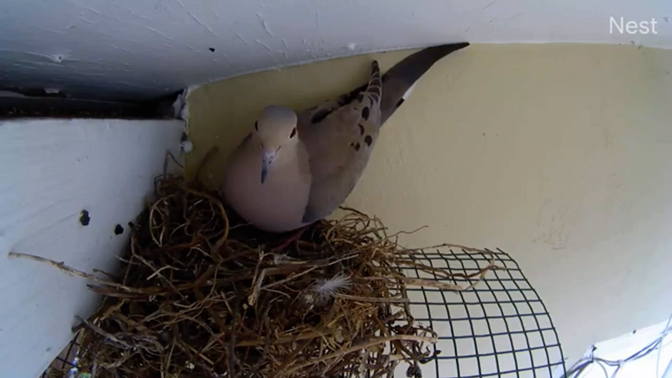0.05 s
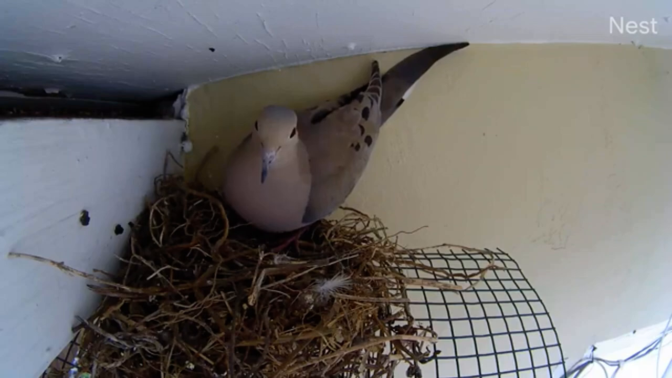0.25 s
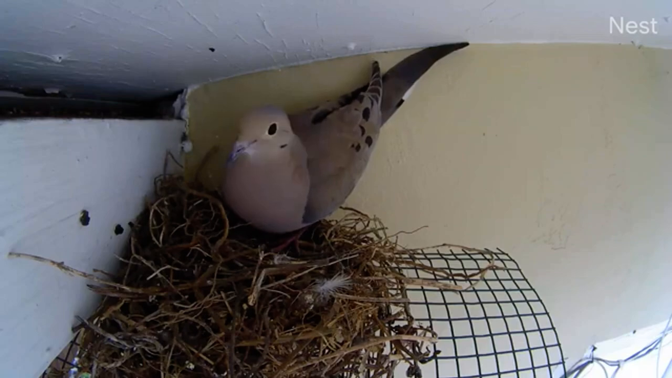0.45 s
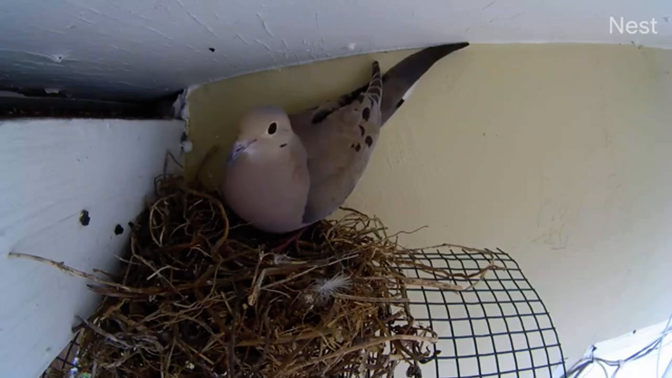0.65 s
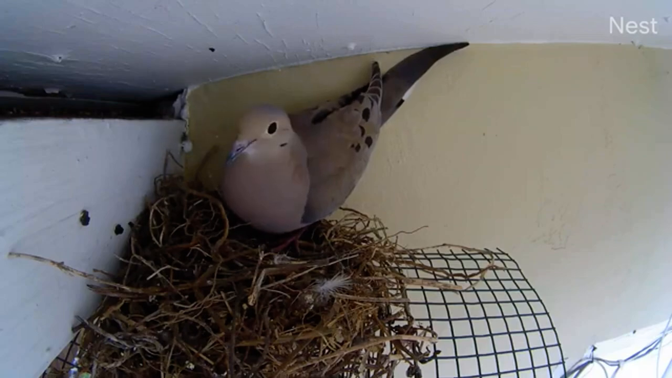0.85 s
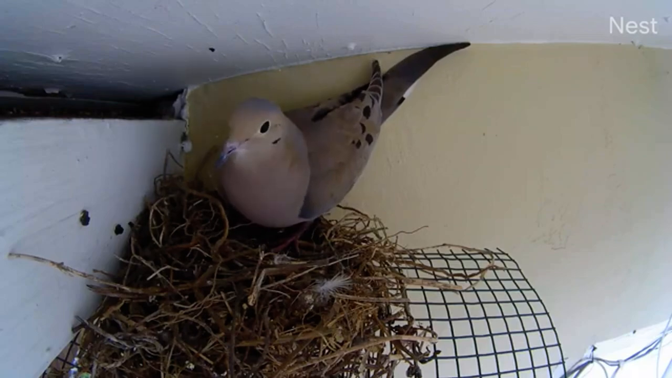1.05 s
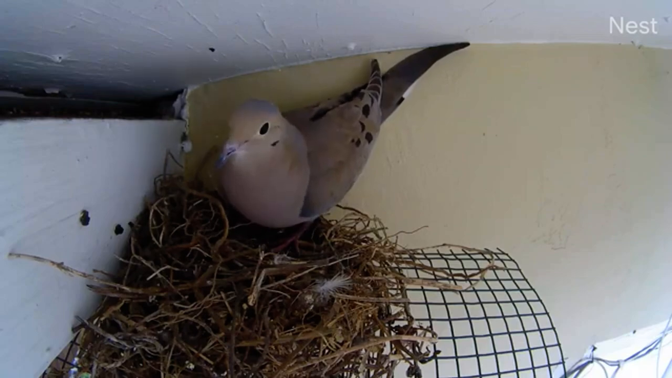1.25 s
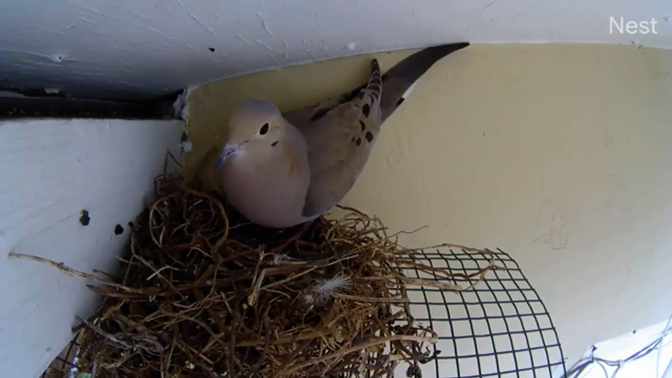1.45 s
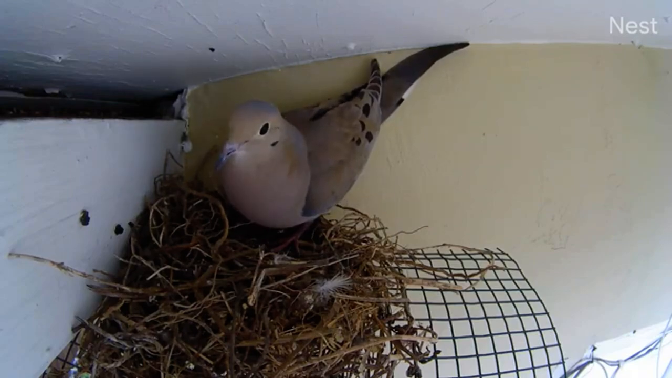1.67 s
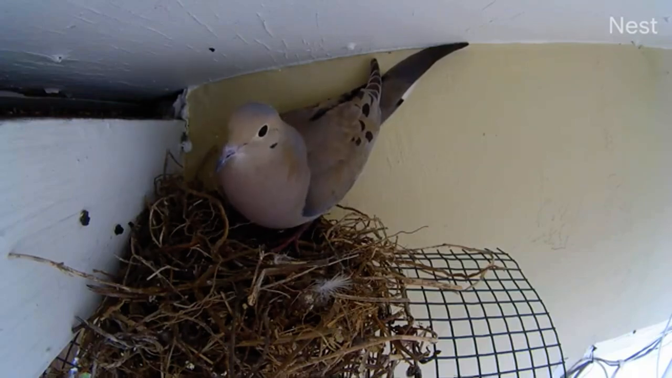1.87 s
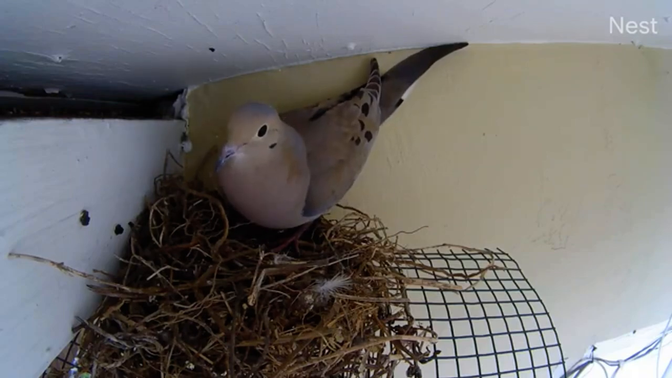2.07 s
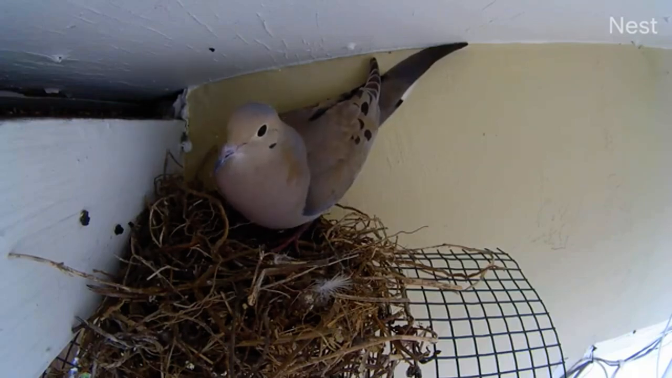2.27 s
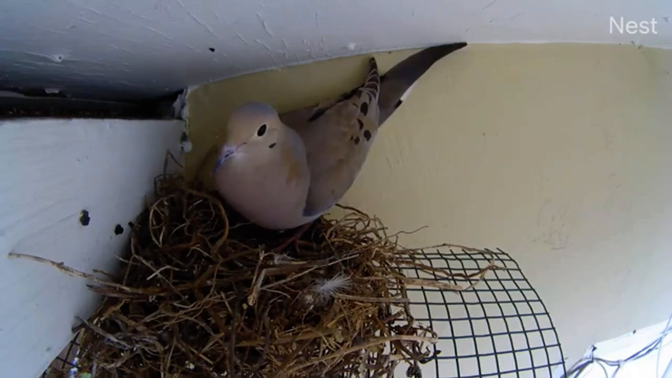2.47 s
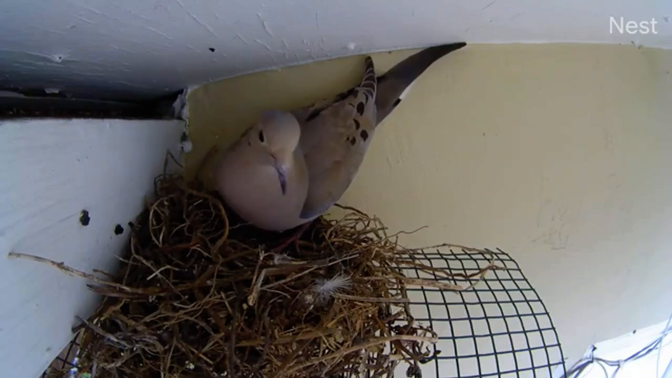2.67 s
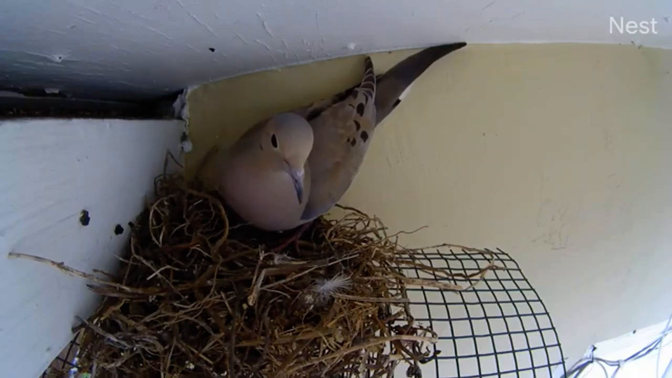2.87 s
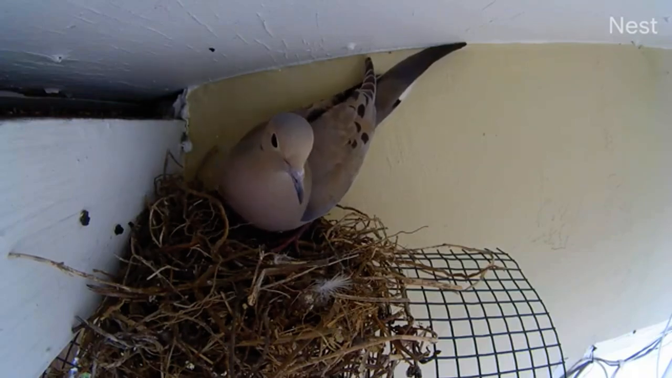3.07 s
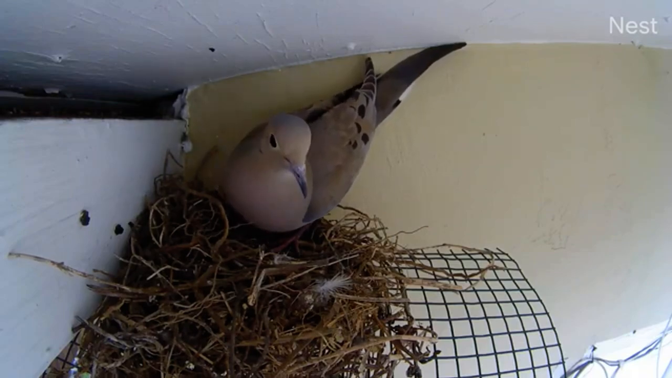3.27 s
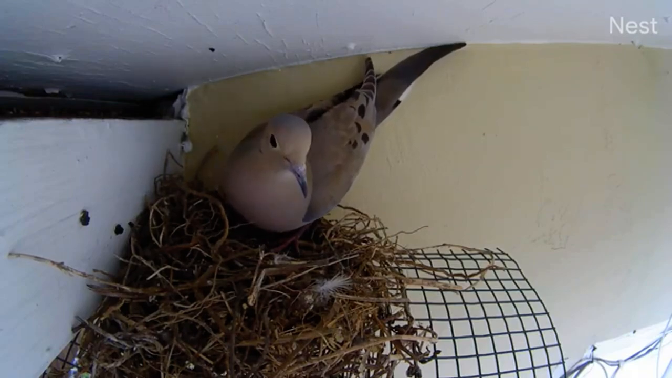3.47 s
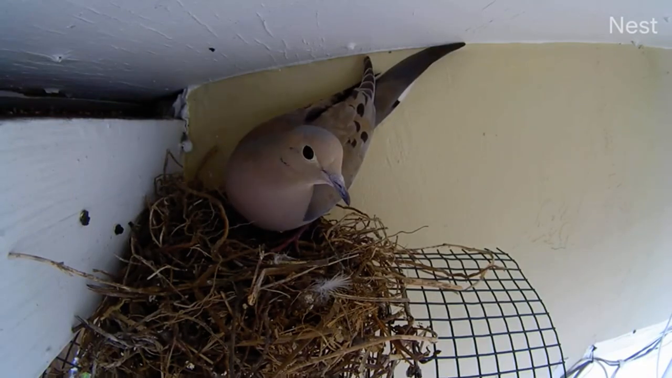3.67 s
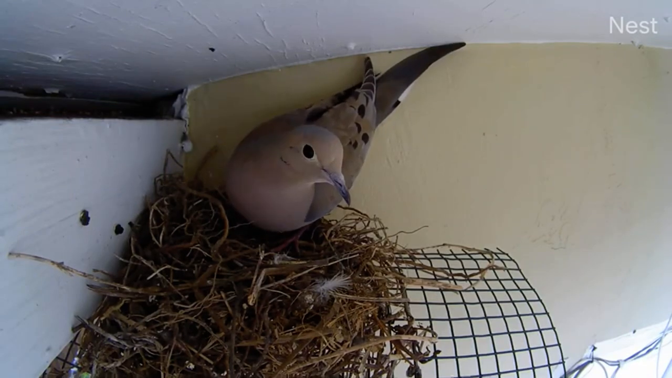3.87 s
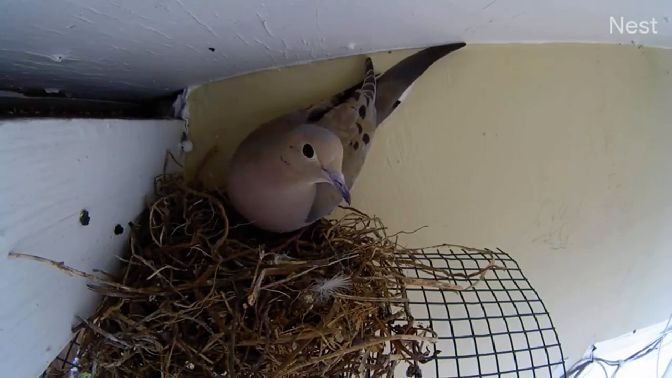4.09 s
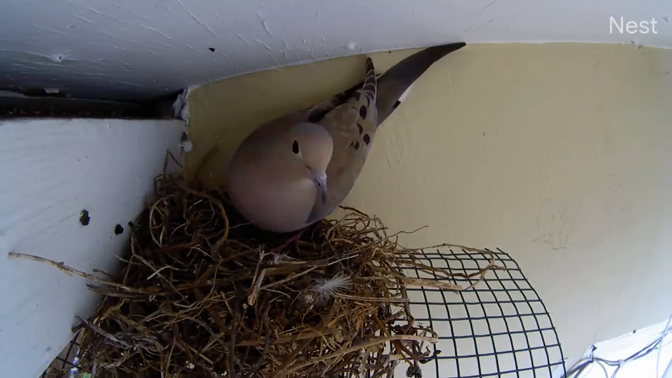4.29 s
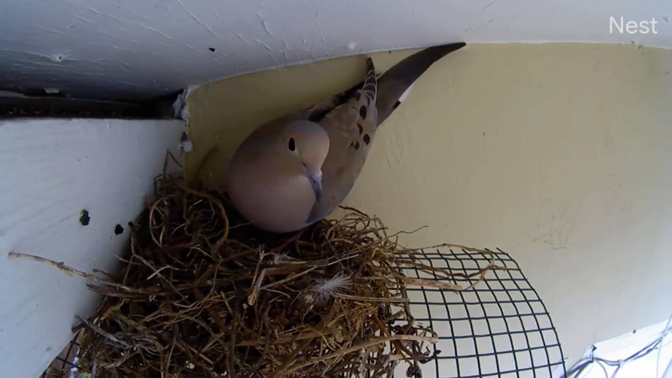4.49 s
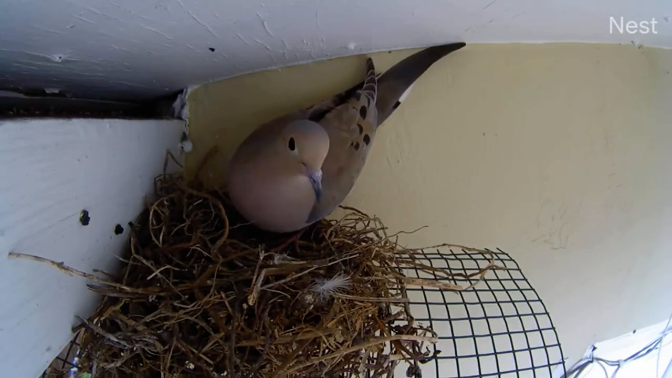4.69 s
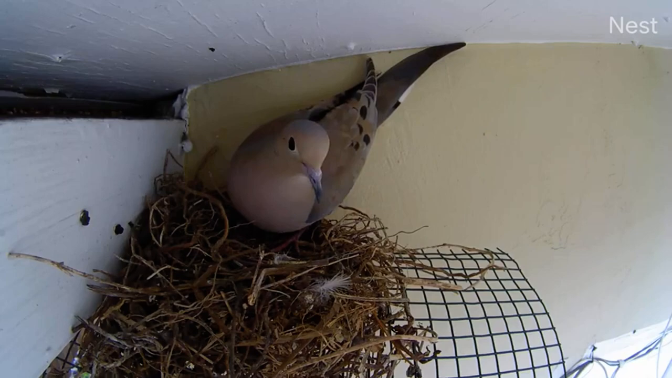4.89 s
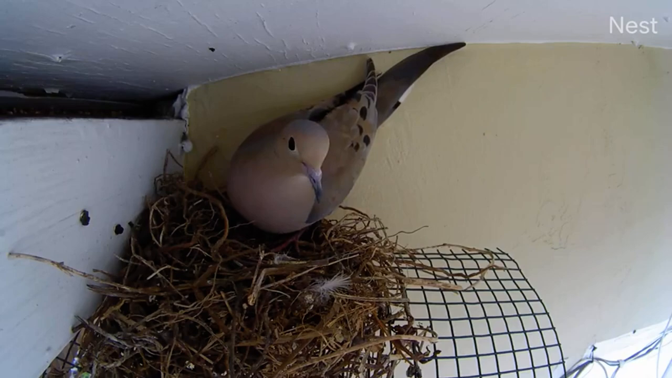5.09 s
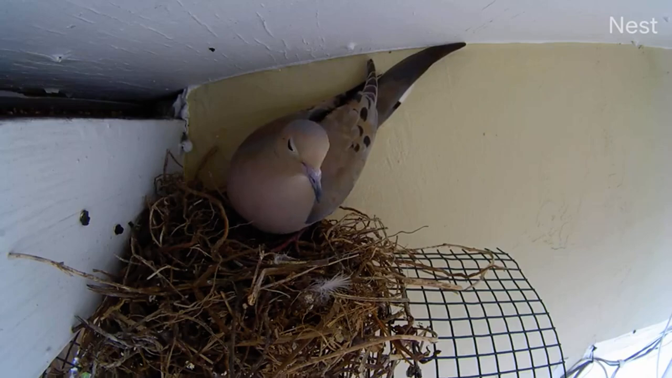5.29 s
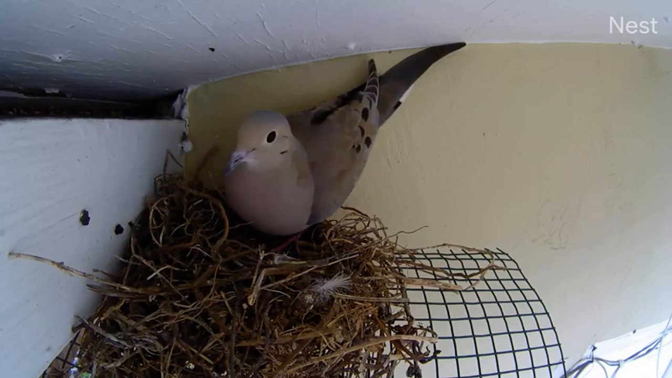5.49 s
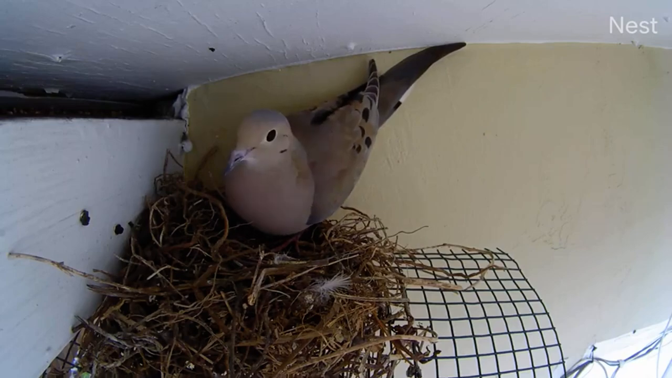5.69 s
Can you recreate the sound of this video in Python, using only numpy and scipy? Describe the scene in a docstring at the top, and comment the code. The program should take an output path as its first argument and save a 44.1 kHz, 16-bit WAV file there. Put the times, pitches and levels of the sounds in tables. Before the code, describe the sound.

Under a sheltered porch roof, small birds peep faintly for about a second, then a nearby dove gives one low, breathy coo: a wavering held note, a sudden leap up, a sinking end. Raspy chirps and quick chatter fill the middle afterwards, then two harsh rattling bursts. The microphone is close to the dove; the other birds are distant and diffuse, over a very faint outdoor hush.

```python
"""Dove coo among small birds

A dove under a porch roof gives one long coo close by: a low, husky held note that leaps up, clears and sinks.
Its voice is a near sine with weak overtones, a beating second vibration and throat-coloured noise.
Small birds peep, chirp and rattle farther off: gliding, frequency-modulated sines smeared by a diffuse
tail and coloured by porch resonances. Thin hiss and a faint outdoor hush are shaped noise."""
import sys
import numpy as np
from scipy import signal
from scipy.fft import rfft, irfft, next_fast_len
from scipy.io import wavfile
from scipy.ndimage import map_coordinates

SR = 44100
rng = np.random.default_rng(int(sys.argv[2]) if len(sys.argv) > 2 else 0)


def digitize_waveform(pressure):
    """Quantize a signal to 16-bit integers and store it at the path in sys.argv[1].

    Rows of a 2-D input are taken as channels; values are limited to [-1, 1].
    """
    field = np.atleast_2d(pressure).T
    bounded = np.clip(field, -1, 1)
    quanta = np.round(bounded * 32767).astype(np.int16)
    wavfile.write(sys.argv[1], SR, quanta)


N = 253134  # samples
NOOK_T60, YARD_T60 = 0.12, 0.36  # reverberation times [s]


def amp(db):
    """Decibel law: amplitude ratio of a level."""
    return 10 ** (np.asarray(db) / 20)


def unit(x):
    """Normalization to an rms of 1."""
    return x / np.sqrt(np.mean(x ** 2) + 1e-20)


def curve(rows):
    """Linear interpolation of (time [s], value) rows, one value per sample."""
    return np.interp(np.arange(N) / SR, *np.transpose(rows))


def wobble(rate, size=N):
    """Band-limited random modulation: a smooth curve through `rate` random knots a second."""
    knots = rng.standard_normal(8192)
    return map_coordinates(knots, [np.arange(size) * rate / SR], mode="wrap")


def filtered(x, response):
    """Linear filtering: the spectrum of x times a response of frequency."""
    m = next_fast_len(N + 8192)
    return irfft(rfft(x, m) * response(np.fft.rfftfreq(m, 1 / SR)), m)[:N]


def noise(spectrum):
    """Spectral shaping: noise of rms 1 coloured by (frequency [Hz], relative density [dB]) rows."""
    f, db = np.transpose(spectrum)

    def colour(hz):
        return amp(np.interp(np.log(hz + 1), np.log(f), db))

    return unit(filtered(rng.standard_normal(N), colour))


def tone(hz):
    """Phase accumulation: a sine, nominally of rms 1, that follows a pitch curve."""
    return np.sqrt(2) * np.sin(2 * np.pi * np.cumsum(hz) / SR)


def gate(start, end, attack, release):
    """Trapezoidal envelope: linear attack, hold and release between two times."""
    t = np.arange(N) / SR
    return np.clip((t - start) / attack, 0, 1) * np.clip((end - t) / release, 0, 1)


def add(track, s, sound):
    """Superposition: mix a sound into a track from time s."""
    start = max(round(s * SR), 0)
    track[start:start + len(sound)] += sound[:len(track) - start]


def echoes(x, t60, wet_db, build_s=0.007):
    """Diffuse reverberation: an exponentially decaying noise tail, at about the same total energy."""
    t = np.arange(SR // 2) / SR
    tail = rng.standard_normal(len(t)) * amp(-60 * t / t60) * (1 - np.exp(-t / build_s))
    tail *= amp(wet_db) / np.linalg.norm(tail)
    tail[0] += 1  # direct sound
    return signal.fftconvolve(x, tail) / np.sqrt(1 + amp(wet_db) ** 2)


def bird_note(s, length, hz, glide, db, rasp, lean_db=0, bend=1, wet_db=-1.0, pulse_hz=0, pulse_db=0,
              sweep=0, rasp_depth=0.075, rasp_rate=420, buzz_depth=0.07, buzz_hz=150, flicker_db=1.5):
    """Frequency modulation: (start [s], sound) of a gliding sine, roughened by noise and buzz, then smeared.

    It leans by lean_db from start to end; a bend over 1 keeps the glide for the end."""
    size = max(int(length * SR), 64)
    u = np.linspace(0, 1, size)
    beat = 2 * np.pi * pulse_hz * length * u
    buzz = tone(buzz_hz * (1 + 0.12 * wobble(40, size)))
    shake = rasp_depth * wobble(rasp_rate, size) + buzz_depth * rasp * buzz
    glided = hz * (1 + glide * (u ** bend - 1 / (1 + bend)))
    pitch = glided * (1 + rasp * shake + sweep * np.sin(beat))
    # pulses are loudest as they sweep down
    level_db = lean_db * u + flicker_db * wobble(150, size) - pulse_db * np.cos(beat)
    swell = np.sqrt(np.abs(np.sin(np.pi * u))) * amp(level_db)
    return s - length / 2, echoes(amp(db) * unit(swell * tone(pitch)), YARD_T60, wet_db)


# colour of the outdoor hush: (frequency [Hz], relative density [dB])
HUSH = [(25, -71.5), (70, -57.5), (120, -22.5), (200, -14.5), (400, -13.5), (620, -2), (800, 2), (1100, -5),
        (1800, -6.5), (3000, -21), (5000, -23.5), (7000, -27), (7700, -36.5), (12000, -34), (15000, -42.5)]


def outdoors(hush_db=-70.0):
    """Stationary noise: the steady hush of the neighbourhood."""
    return amp(hush_db) * noise(HUSH)


# one bird's falling peeps:
# (middle [s], length [s], pitch [Hz], fall [share of pitch], relative level [dB])
PEEPS = [(0.041, 0.0434, 2575, 0.16, -50), (0.164, 0.032, 2494, 0.12, -48.5),
         (0.295, 0.014, 2470, 0.023, -47), (0.653, 0.014, 2760, 0.049, -57),
         (0.682, 0.035, 2430, 0.14, -53), (0.786, 0.039, 2392, 0.24, -56.5),
         (0.907, .054, 2534, 0.025, -49), (1.03, 0.035, 2460, 0.15, -56.5),
         (1.142, 0.044, 2533, 0.064, -51), (1.219, 0.021, 2676, .02, -52),
         (1.26, 0.034, 2617, 0.029, -51.5), (1.372, 0.05, 2603, 0.049, -52),
         (1.472, 0.076, 2563, 0.013, -55.5), (1.591, 0.065, 2647, 0.058, -59),
         (1.684, 0.053, 2735, 0.0098, -51.5), (1.952, 0.041, 2630, 0.18, -56.5),
         (2.051, 0.051, 2823, 0.011, -52.5)]


def peeps():
    """Frequency glide: short, nearly clear notes that swell and drop at the end."""
    out = np.zeros(N)
    for s, length, hz, fall, db in PEEPS:
        add(out, *bird_note(s, length, hz, -fall, db, rasp=0.2, lean_db=0.5, bend=1.5, wet_db=0,
                            pulse_hz=59.7, sweep=0.021))
    return out


# colour of the thin hiss: (frequency [Hz], relative density [dB])
HISS = [(1500, -62), (2500, -2), (3200, 5.5), (4500, -10.5), (5500, 0), (6900, -2), (7400, -41),
        (7900, -55.5)]
# lone puffs of it: (middle [s], length [s], relative level [dB])
PUFFS = [(1.03, 0.23, -75.5), (1.135, .038, -73.5), (3.885, 0.038, -73), (4.12, 0.25, -71.5),
         (4.85, .48, -81.5), (5.21, 0.37, -78.5)]


def hiss(flicker_db=5.5, lead_s=0.037, lisp_hiss_s=0.16, lisp_hiss_db=-10):
    """Amplitude-modulated noise: flickering hiss round each lisp and in lone puffs, with a diffuse tail."""
    swell = np.zeros(N)
    lisps = [(s - lead_s, lisp_hiss_s, lisp_db + lisp_hiss_db) for s, *note, lisp_db in CHIRPS]
    for s, length, db in lisps + list(PUFFS):
        hump = np.sqrt(np.abs(np.hanning(int(length * SR))))
        add(swell, s - length / 2, amp(db) * hump)
    flickering = swell * amp(flicker_db * wobble(80)) * noise(HISS)
    return echoes(flickering, YARD_T60, wet_db=0.5)[:N]


# another bird's chirps, a lisp and then a raspy note:
# (middle of note [s], pitch [Hz], glide [share of pitch], trill depth [share of pitch],
#  relative note level [dB], lisp pitch [Hz], relative lisp level [dB])
CHIRPS = [(.23, 3260, .17, .08, -64.5, 3820, -72), (1.262, 3290, 0.025, 0.026, -61.5, 4080, -78.5),
          (1.38, 3370, -0.039, 0.037, -65, 4320, -77), (1.495, 3556, -0.033, 0.11, -55.5, 4060, -71.5),
          (1.725, 3496, 0.077, 0.073, -61, 4200, -66), (1.839, 3686, -0.13, 0.07, -57.5, 4100, -65.5),
          (2.089, 3510, 0.035, 0.08, -56.5, 4080, -66), (2.243, 3534, -0.044, 0.061, -50, 4200, -60),
          (2.395, 3517, 0.15, 0.066, -51, 4120, -62), (2.545, 3560, .08, 0.071, -51.5, 4200, -56.5),
          (2.735, 3472, 0.14, 0.062, -51, 4650, -54), (2.92, 3450, 0.194, 0.096, -53.5, 4550, -61.5),
          (3.088, 3646, 0.084, 0.081, -52.5, 4590, -57.5), (3.258, 3437, -0.12, 0.063, -54.5, 4600, -59),
          (3.428, 3560, 0.023, 0.14, -56.5, 4200, -65.5), (3.56, 3660, 0.023, 0.12, -60, 4600, -66),
          (3.732, 3700, -0.027, 0.12, -57, 5150, -63), (3.925, 3640, -0.1, 0.1, -54, 5200, -61)]


def chirps(lisp_lead_s=0.06, lisp_s=0.035, note_s=0.085):
    """Periodic frequency modulation: a high lisp, then a lower, raspy note that glides and trills."""
    out = np.zeros(N)
    for s, hz, glide, trill, db, lisp_hz, lisp_db in CHIRPS:
        add(out, *bird_note(s - lisp_lead_s, lisp_s, lisp_hz, -0.1, lisp_db, rasp=0.41, wet_db=0.0))
        add(out, *bird_note(s, note_s, hz, glide, db, rasp=0.33, wet_db=-2,
                            pulse_hz=85.1, pulse_db=3.5, sweep=trill))
    return out


# thin, high whistles: (middle [s], length [s], pitch [Hz], relative level [dB])
TWITTERS = [(0.268, 0.021, 4110, -64), (0.657, 0.086, 4165, -67.5), (.759, 0.043, 4177, -61),
            (0.99, 0.023, 4112, -57.5), (1.075, 0.12, 4257, -61), (1.216, .04, 4084, -66.5),
            (1.333, 0.09, 4220, -69.5), (1.427, 0.038, 4080, -68), (1.559, 0.074, 4070, -67),
            (1.675, 0.093, 4200, -73), (1.791, .09, 4070, -67.5), (2.02, .05, 4060, -70),
            (2.182, .023, 3896, -46), (2.44, .051, 4070, -66), (2.49, 0.028, 3850, -57),
            (3.295, 0.071, 4815, -63)]
# one long, faint call
WHEEZE_AT_S, WHEEZE_S, WHEEZE_HZ, WHEEZE_DB, WHEEZE_RASP = 5.49, 0.44, 4690, -71, 0.28


def twitters(rasp=0.094, fall=0.016):
    """Near-pure tones: thin, nearly level whistles, and one long wheeze roughened by modulation."""
    out = np.zeros(N)
    for s, length, hz, db in TWITTERS:
        add(out, *bird_note(s, length, hz, -fall, db, rasp, wet_db=-2.0))
    add(out, *bird_note(WHEEZE_AT_S, WHEEZE_S, WHEEZE_HZ, 0, WHEEZE_DB, WHEEZE_RASP))
    return out


# sharp chips: (middle [s], pitch [Hz], relative level [dB])
CHIPS = [(.78, 2486, -46.5), (.798, 2320, -50.5), (.927, 2554, -52.5), (2.263, 3417, -59),
         (2.938, 3580, -46), (3.092, 3600, -44.5), (3.432, 3720, -49), (3.56, 3710, -52),
         (3.712, 4140, -54.5)]


def chips(length=0.011, fall=0.13, rasp=0.15):
    """Rapid frequency glide: sharp, steeply falling flicks that stand out of the chirping."""
    out = np.zeros(N)
    for s, hz, db in CHIPS:
        add(out, *bird_note(s, length, hz, -fall, db, rasp, wet_db=-2))
    return out


# soft pops as the throat opens and as the voice leaps: (time [s], envelope peak [dB])
POPS = [(1.060, -54), (1.106, -45.5), (1.997, -42.5)]


def pops(ring_hz=480, rise_s=0.0044):
    """Damped resonance: each soft pop rings the throat for a few cycles."""
    out, t = np.zeros(N), np.arange(SR // 20) / SR
    u = 2 * t / rise_s
    # the squared envelope peaks at u = 1, half of rise_s
    ring = (u * np.exp(1 - u)) ** 2 * np.sin(2 * np.pi * ring_hz * t)
    for s, db in POPS:
        add(out, s, amp(db) * ring)
    return out


# what the throat passes: (frequency [Hz], relative density or gain [dB])
THROAT = [(20, -32), (60, -31.5), (170, -25.5), (320, -16.5), (430, -4), (560, -3.5), (690, -9),
          (850, -14.5), (950, -33.5), (1150, -23), (1400, -38), (2500, -34.5), (5000, -120)]


def overtone(pitch, order):
    """Source-filter principle: one multiple of the note, as strongly as the throat passes it."""
    hz, db = np.transpose(THROAT)
    return amp(np.interp(order * pitch, hz, db)) * tone(order * pitch)


# the coo, held, leaping up and sinking: (time [s], pitch [Hz], level [dB])
COO = [(1.12, 505, -48), (1.138, 450.2, -42.5), (1.184, 449, -44), (1.223, 439.2, -44.5), (1.34, 431, -44),
       (1.385, 431, -46.5), (1.403, 448.6, -51.5), (1.426, 433, -50), (1.464, 423, -45.5),
       (1.503, 427.2, -53), (1.526, 430.9, -47), (1.851, 433.5, -47.5), (1.865, 467, -54),
       (1.883, 451.7, -48), (1.939, 464.2, -41.5), (1.974, 471.7, -44.5), (1.994, 543.3, -34.5),
       (2.003, 569, -31), (2.012, 605.7, -36), (2.036, 592.3, -39), (2.098, 585.0, -36.5),
       (2.197, 529, -36.5), (2.222, 503.4, -42.5), (2.249, 461, -42.5), (2.301, 430, -43),
       (2.335, 422.6, -46.5), (2.365, 403, -55.5), (2.413, 394.5, -61), (2.455, 358, -61)]
# a second vibration that comes and goes in the held note: (time [s], pitch [Hz], level [dB])
FLUTTER = [(1.12, 590, -56), (1.249, 565.5, -59.5), (1.405, 558.8, -59.5), (1.601, 550, -63),
           (1.68, 557.7, -53), (1.76, 528.4, -57.5), (1.84, 516.5, -50.5), (1.91, 560, -57),
           (1.98, 553, -55)]
COO_START_S, COO_END_S, ATTACK_S, RELEASE_S = 1.117, 2.475, 0.006, 0.03
LEAP_S = 2.0  # the second vibration stops here
# turbulent air in the throat: level, head start, fade; it surges where the voice leaps
HUSK_DB, AIR_LEAD_S, AIR_RELEASE_S = -56, 0.01, 0.086
HUSK_BURST_DB, HUSK_BURST_S = 4.5, 0.13


def coo(jitter=0.0083, shimmer_db=1.02, octave_db=-37, throat_db=-7.5, overtone_flicker_db=2.0,
        overtone_jitter=0.014, flutter_octave_db=-23, flutter_spread=0.0409, flutter_depth_db=3.0):
    """Beating: the syrinx sings a near sine that beats with an uneven second vibration just above it, made
    husky by turbulent air in the throat."""
    t = np.arange(N) / SR
    pitch = curve([(s, hz) for s, hz, db in COO]) * (1 + jitter * wobble(90))
    effort_db = curve([(s, db) for s, hz, db in COO])

    # the closed beak lets few, unsteady overtones out; the throat lifts the octave while the note is low
    shaky = pitch * (1 + overtone_jitter * wobble(150))
    throaty = overtone(shaky, order=2) + overtone(shaky, order=3)
    upper = amp(octave_db) * tone(2 * shaky) + amp(throat_db) * throaty
    voice = tone(pitch) + amp(overtone_flicker_db * wobble(34.79)) * upper
    note = amp(effort_db + shimmer_db * wobble(70)) * voice

    flutter_db = curve([(s, db) for s, hz, db in FLUTTER])
    flutter_pitch = curve([(s, hz) for s, hz, db in FLUTTER]) * (1 + flutter_spread * wobble(100))
    flutter = tone(flutter_pitch) + amp(flutter_octave_db) * tone(2 * flutter_pitch)
    flutter *= amp(flutter_db + flutter_depth_db * wobble(37))

    surge_db = HUSK_BURST_DB * np.exp(-np.abs(t - LEAP_S) / HUSK_BURST_S)
    husk = amp(HUSK_DB + surge_db) * noise(THROAT)

    return (gate(COO_START_S, COO_END_S, ATTACK_S, RELEASE_S) * note
            + gate(COO_START_S, LEAP_S, ATTACK_S, RELEASE_S) * flutter
            + gate(COO_START_S - AIR_LEAD_S, COO_END_S, ATTACK_S, AIR_RELEASE_S) * husk)


# dull thuds under the coo: (time [s], relative level [dB])
BUMPS = [(1.305, -60), (2.006, -53), (2.025, -55.5), (2.107, -58)]


def bumps(width_s=0.0016):
    """Impulsive excitation: dull little thuds under the coo, each one low push."""
    out, u = np.zeros(N), np.arange(SR // 30) / SR / width_s
    push = u * u * np.exp(-u) * (1 - u / 4)
    for s, db in BUMPS:
        add(out, s, amp(db) * push)
    return out


# a third bird chatters through the loudest chirps
CHATTER_START_S, CHATTER_END_S, CHATTER_HZ, CHATTER_DB = 2.2, 3.35, 3930, -61


def chatter(count=40, length=0.027, rasp=0.2, pitch_spread=0.091, glide_spread=0.08, spread_db=1.0):
    """Random variation: a quick, even string of tiny notes, each with its own pitch, glide and level."""
    out = np.zeros(N)
    times = np.linspace(CHATTER_START_S, CHATTER_END_S, count)
    for s, (sharp, glide, loud) in zip(times, rng.standard_normal((count, 3))):
        hz = CHATTER_HZ * (1 + pitch_spread * sharp)
        add(out, *bird_note(s, length, hz, glide_spread * glide, CHATTER_DB + spread_db * loud, rasp))
    return out


# harsh falling syllables, in two rattling runs:
# (middle [s], length [s], pitch [Hz], relative level [dB])
SYLLABLES = [(4.436, 0.038, 2800, -63), (4.485, 0.085, 2580, -56), (4.555, 0.078, 2830, -53.5),
             (4.643, 0.086, 2830, -52), (4.744, 0.078, 2900, -51.5), (4.783, .03, 3360, -60.5),
             (4.842, 0.0698, 2840, -55), (5.216, 0.032, 2800, -52), (5.251, 0.044, 2500, -59.5),
             (5.306, .075, 2850, -56), (5.391, 0.075, 2900, -55.5), (5.484, 0.074, 2900, -52.5)]


def rattles(fall=0.2086, undertone_ratio=0.96, undertone_db=-5):
    """Two-voice modulation: harsh, pulsed syllables, each doubled by a lower voice, that fall and fade."""
    out = np.zeros(N)
    for s, length, hz, db in SYLLABLES:
        for ratio, voice_db in [(1, 0), (undertone_ratio, undertone_db)]:
            add(out, *bird_note(s, length, ratio * hz, -fall, db + voice_db, rasp=0.32, lean_db=-3.5,
                                wet_db=-1, pulse_hz=60.27, pulse_db=2.5, sweep=0.062))
    return out


# resonances under the roof: (frequency [Hz], width [Hz], relative gain [dB])
PORCH = [(2356, 84, -2), (2407, 210, -9), (2602, 47, -2.5), (2756, 54, -1.5), (2997, 67, -1),
         (3232, 37, -2), (3447, 44, -3.5), (3680, 53, -1.5), (3850, 20, -6.5), (4052, 36, 4.5),
         (4210, 30, -4.5), (4300, 18, -5.5), (4470, 45, 3), (4940, 160, -1.5), (5500, 21, 0)]


def porch(x, direct_db=-11, gain_db=0.5):
    """Resonance: roof and walls close to the microphone ring at fixed pitches and comb the treble."""
    def response(f):
        total = amp(direct_db)
        for hz, width, db in PORCH:
            damping = 1j * f * width
            total = total + amp(db) * damping / (hz * hz - f * f + damping)
        return total

    return amp(gain_db) * filtered(x, response)


def scene():
    """Superposition: the near dove, the porch-coloured yard and the hush."""
    # the nook under the roof answers briefly
    dove = echoes(coo() + pops() + bumps(), NOOK_T60, wet_db=-24.0)[:N]
    birds = peeps() + chirps() + twitters() + chips() + chatter() + rattles()
    yard = porch(amp(-8.0) * birds + hiss())
    return (outdoors() + dove + yard)[None]


TOP_HZ = 14400  # band limit


def record(dry):
    """Band limiting: nothing passes at or above the top frequency."""
    return filtered(dry[0], lambda hz: hz < TOP_HZ)[None]


dry = scene()
out = record(dry)
digitize_waveform(out)
```